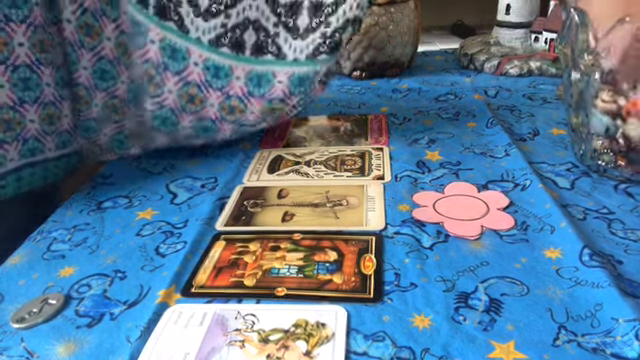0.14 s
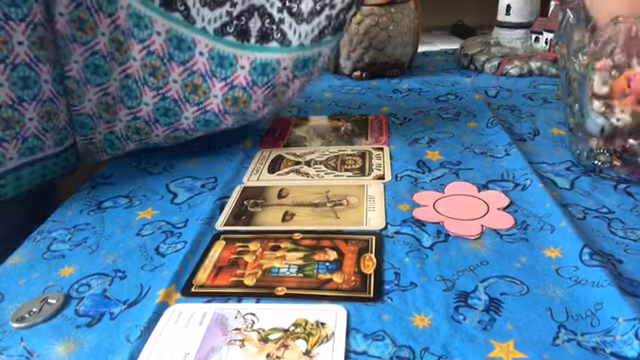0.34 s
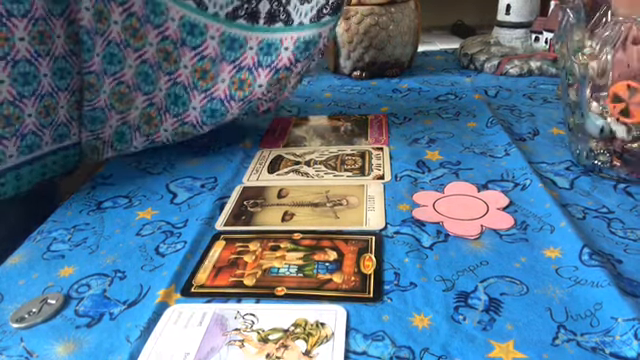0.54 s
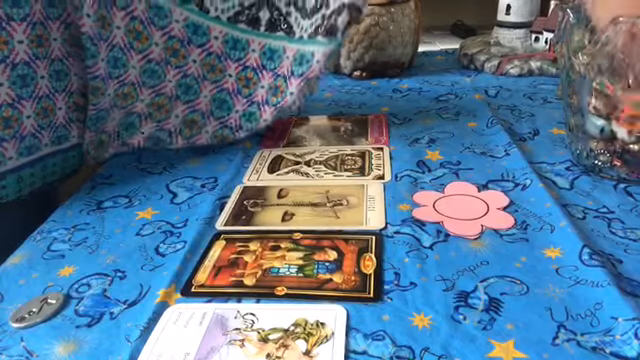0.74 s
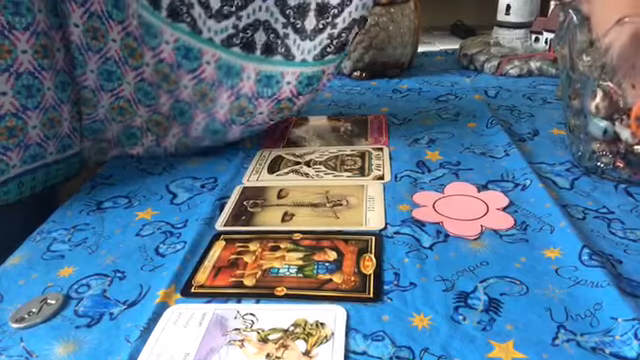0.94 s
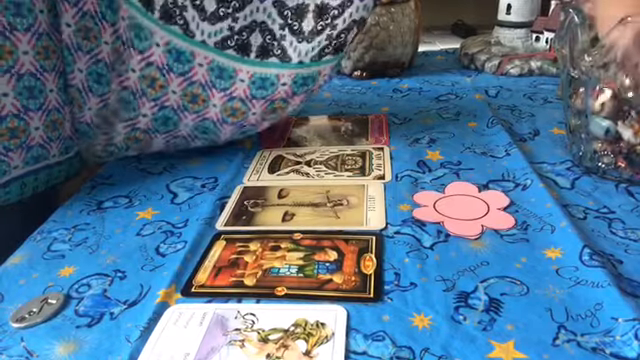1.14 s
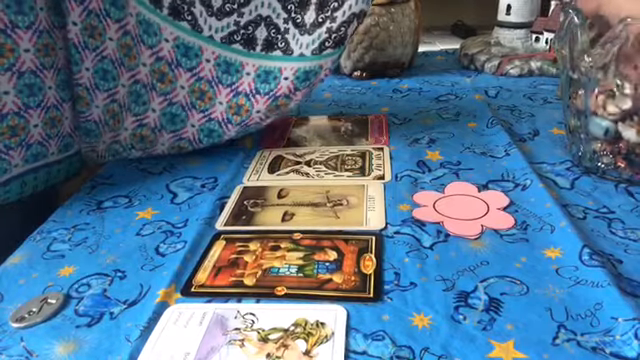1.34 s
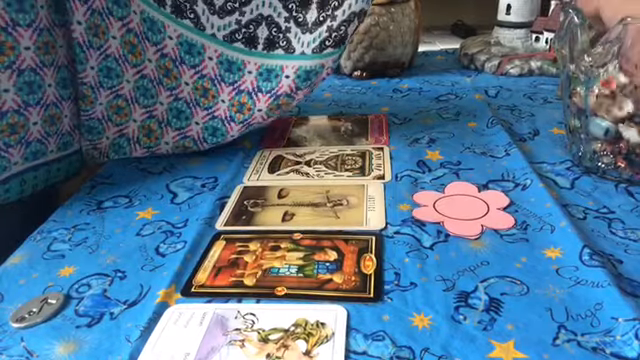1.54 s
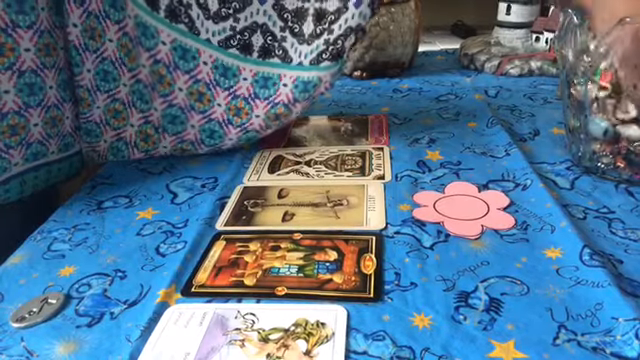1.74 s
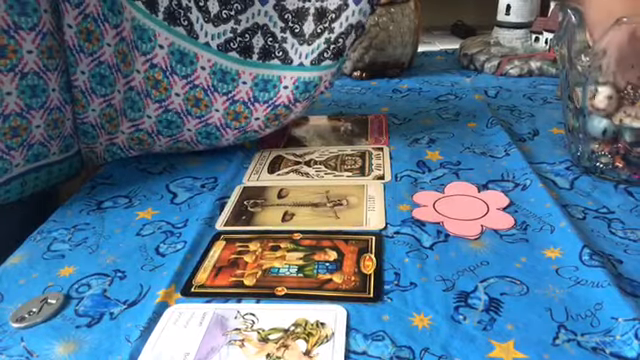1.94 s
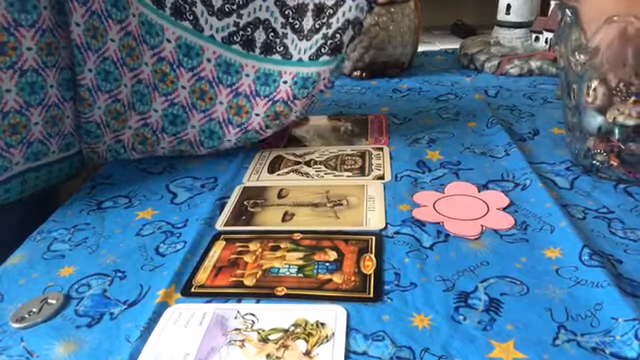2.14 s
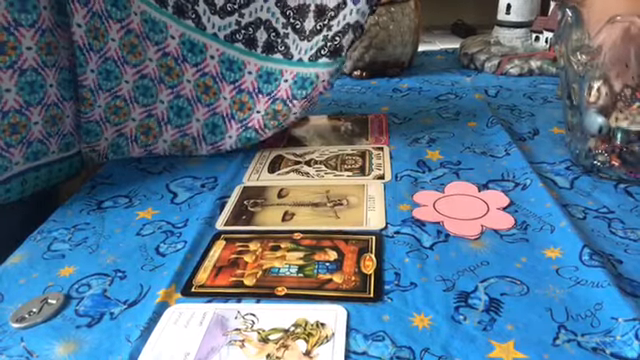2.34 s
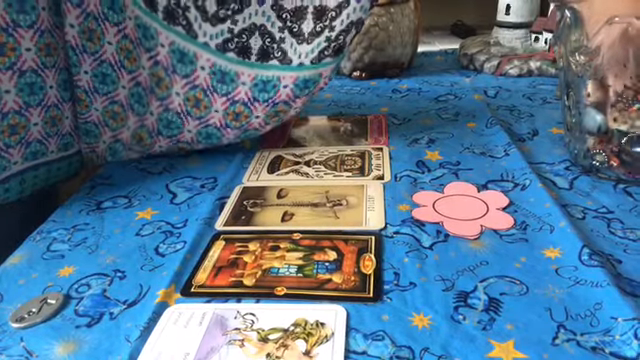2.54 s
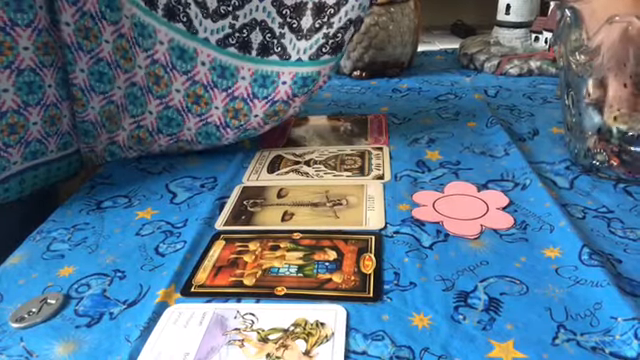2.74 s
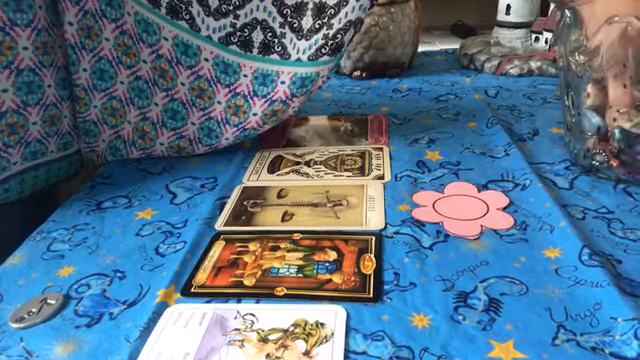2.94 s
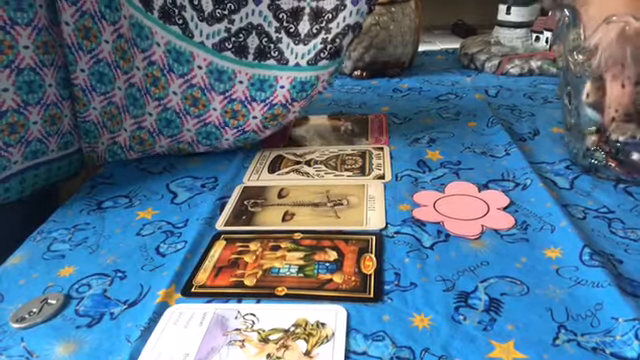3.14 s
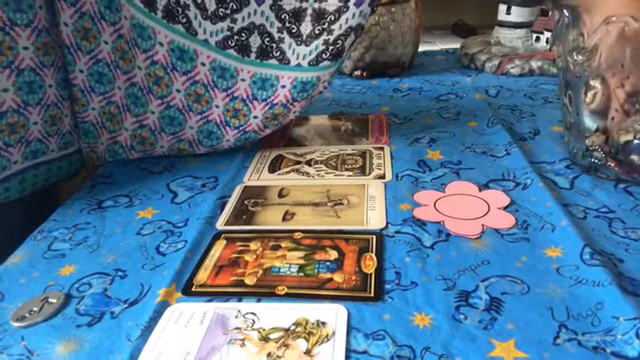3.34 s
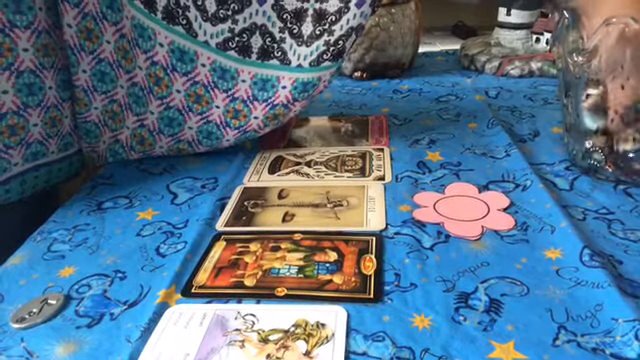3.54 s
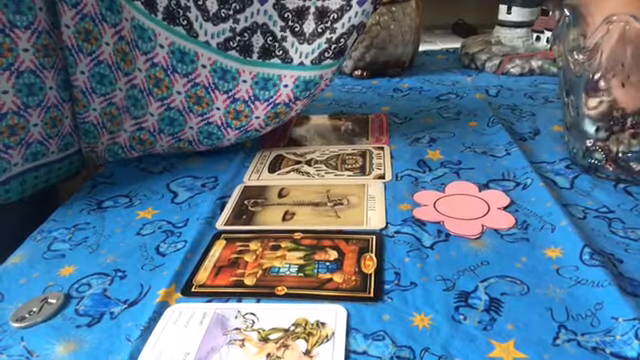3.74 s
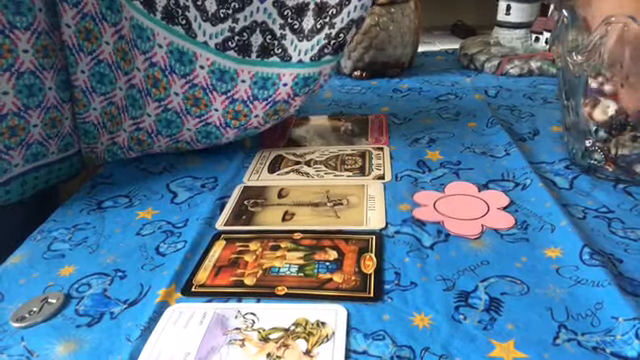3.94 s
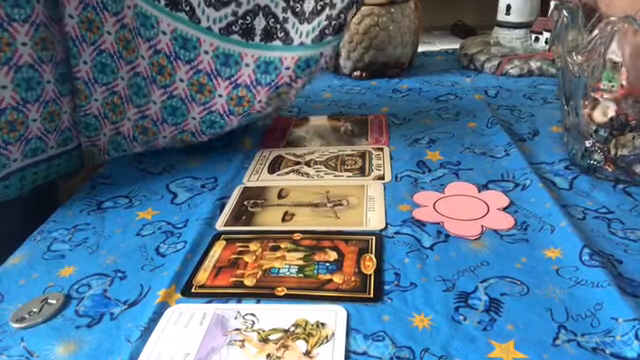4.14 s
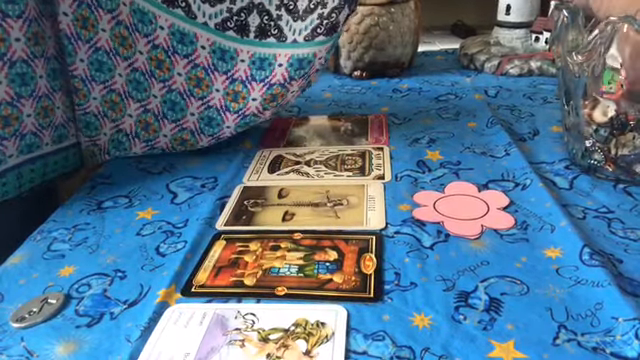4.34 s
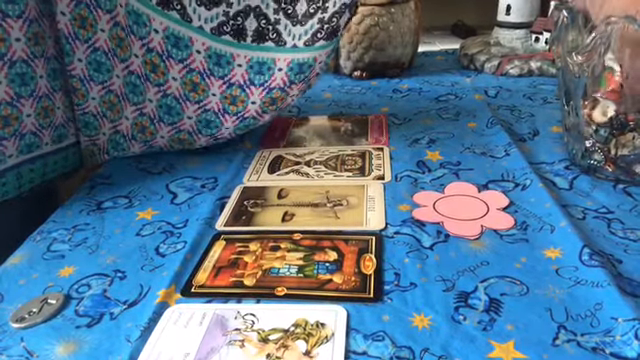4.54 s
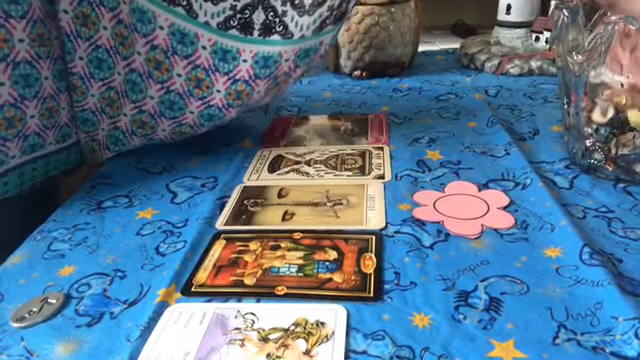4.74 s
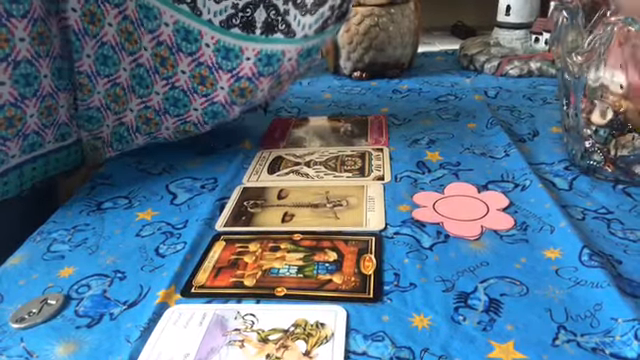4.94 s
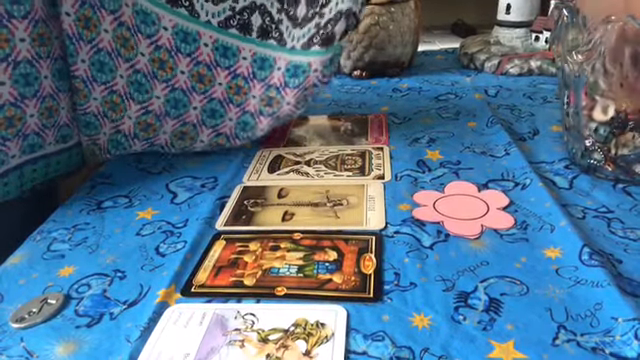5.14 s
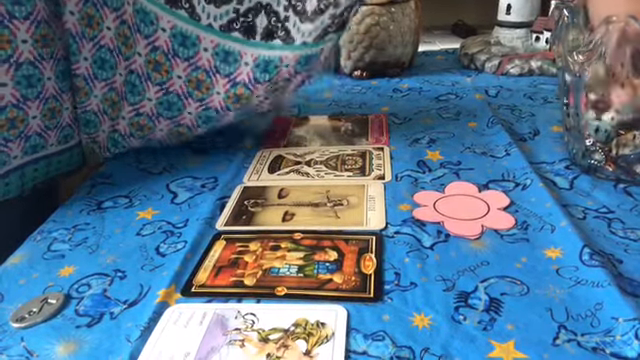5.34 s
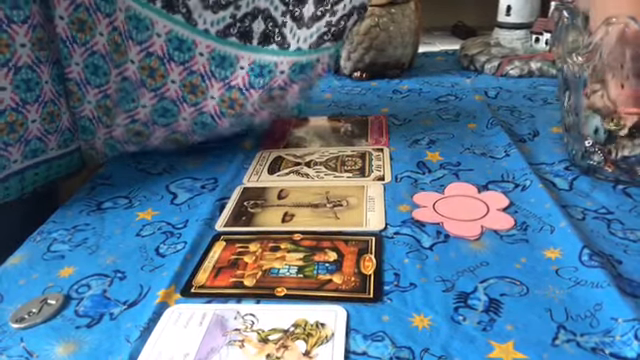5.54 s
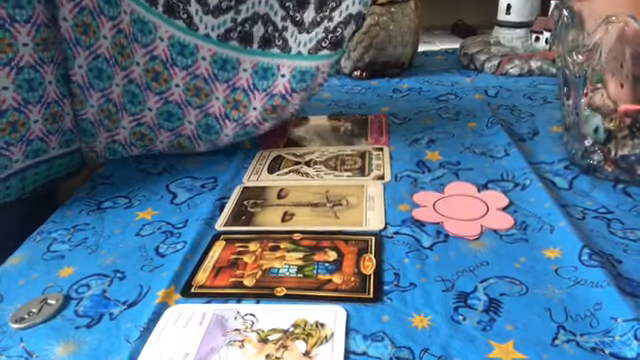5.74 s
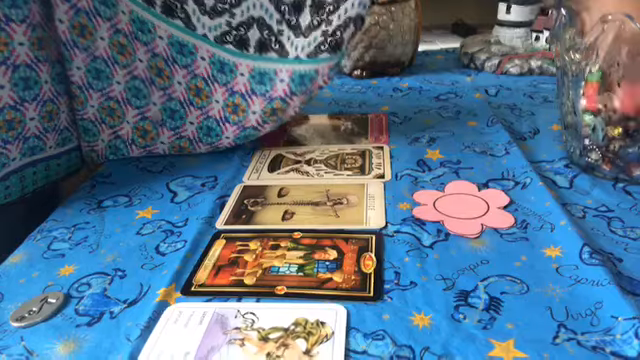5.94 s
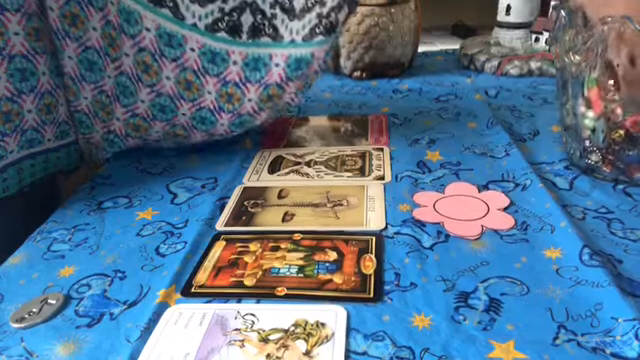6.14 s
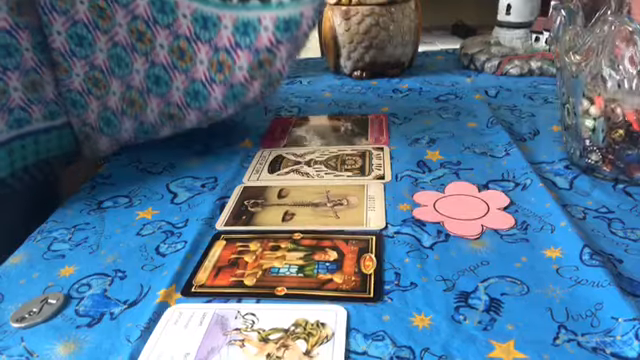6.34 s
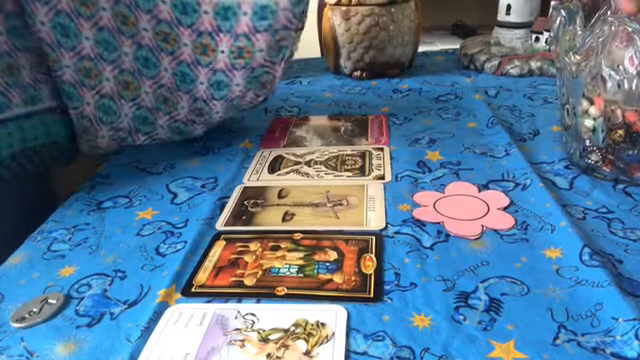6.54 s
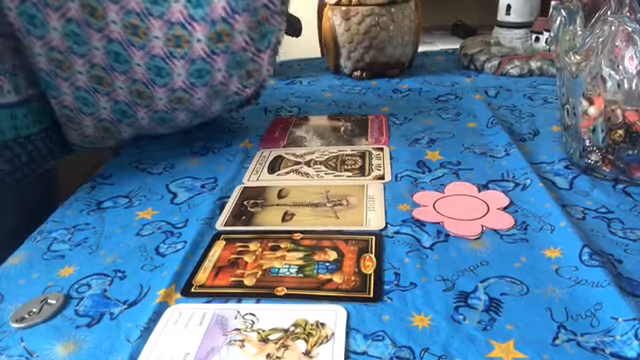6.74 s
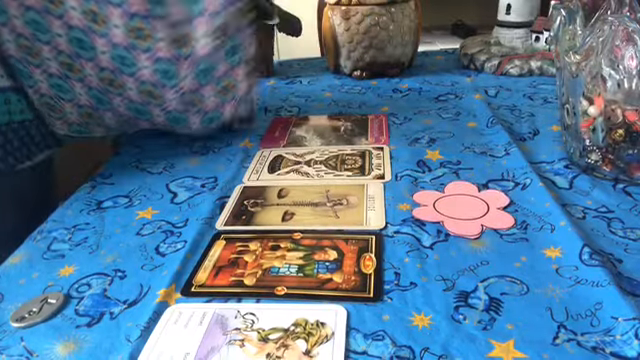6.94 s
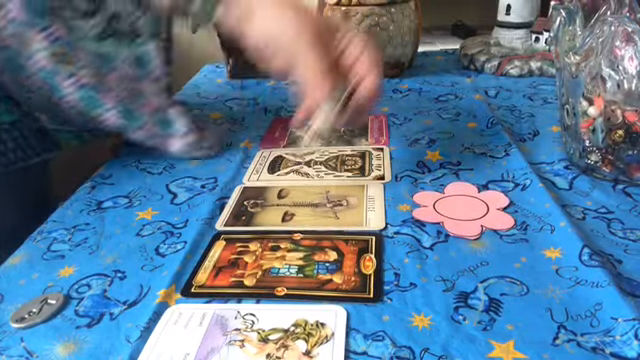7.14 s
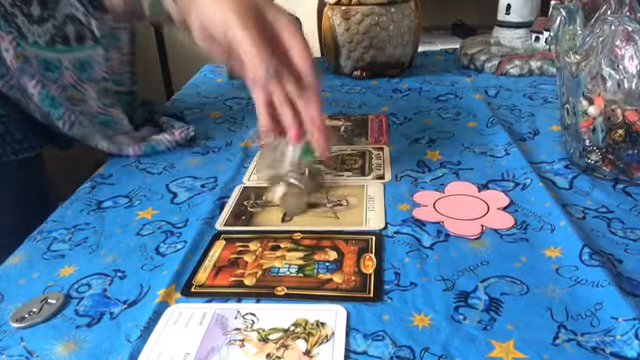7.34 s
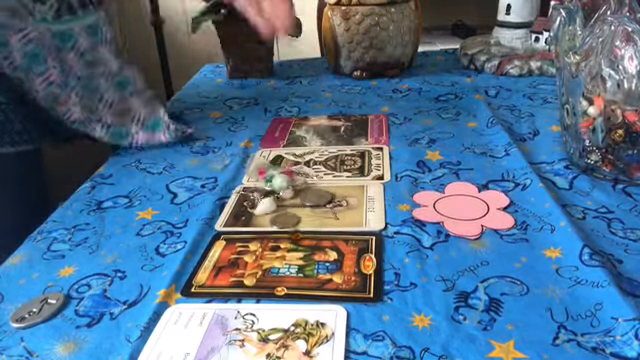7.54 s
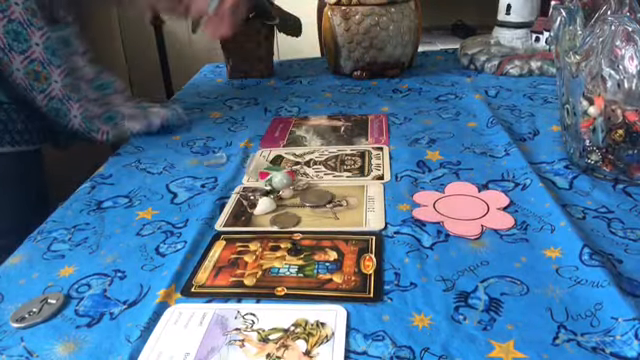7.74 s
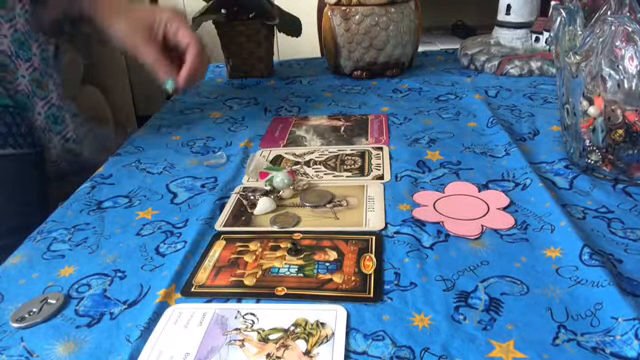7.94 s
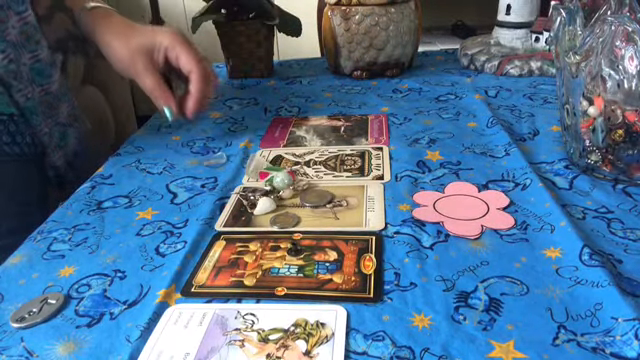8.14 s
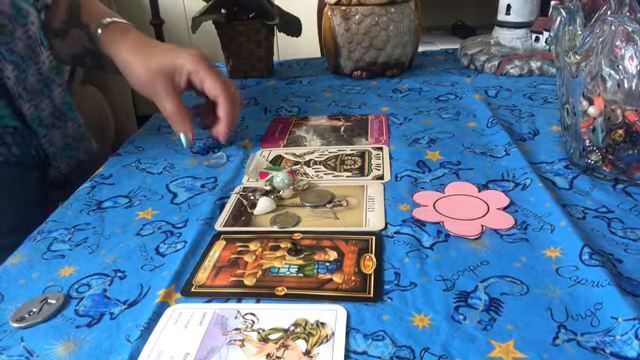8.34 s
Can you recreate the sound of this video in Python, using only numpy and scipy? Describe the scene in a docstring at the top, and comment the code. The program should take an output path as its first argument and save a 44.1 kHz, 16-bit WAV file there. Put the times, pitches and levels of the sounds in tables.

```python
"""Charms rummaged in a glass jar, then dropped.

A hand stirs small glass, stone and metal charms in a quiet room: strokes gate random touches, which
excite the jar's resonances, scrapes, small clinks and a heap rumble; single knocks ring decaying modes.
Metal charms chime as paired dying sines. A handful then drops on cards on a cloth-covered table:
damped clacks, a tumbling clatter and table thuds. Noise reflections and still air surround it all."""
import sys
import numpy as np
from scipy import signal
from scipy.fft import rfft, irfft
from scipy.io import wavfile
from scipy.ndimage import uniform_filter1d

SR = 44100
rng = np.random.default_rng(int(sys.argv[2]) if len(sys.argv) > 2 else 0)


def bounce(signal):
    """Save signal as a 16-bit WAV file at the path given by the first command-line argument."""
    frames = np.transpose(np.atleast_2d(signal))
    limited = np.clip(frames, -1, 1)
    pcm = np.round(limited * 32767).astype(np.int16)
    wavfile.write(sys.argv[1], SR, pcm)


N = 369999

# Modes of the jar wall. Each row: frequency in Hz, bandwidth in Hz, relative level in dB.
JAR_MODES = [(783, 27, -12), (958, 14, -4.5), (1005, 14, -5), (2476, 11.1, 4), (2562, 14, 1.5),
             (3698, 8.9, 0), (4091, 12.4, 5), (4240, 25, -2), (4645, 26, 1.5), (4805, 52, -0.5),
             (4823, 19, -8), (5168, 44, 3.5), (5344, 210, -7.5), (6844, 68.5, -3.5), (6840, 40, -23.5),
             (7103, 56, 1), (7750, 61, -4), (8520, 55, -11.5), (9250, 56, -4.5), (9700, 55, -20.5),
             (9800, 37, -8), (10290, 41, -22), (10410, 29, -21.5), (10810, 61, -8), (12480, 91, -29.5),
             (14280, 50, -24), (14500, 92, -18.5)]
# Spectrum of the dry tick of charm on charm. Each row: frequency in Hz, relative level in dB.
TICK_SPECTRUM = [(300, -24), (900, -3.5), (1500, 0), (2200, 0), (3400, 1), (5300, 3), (8500, -3.5),
                 (12000, -2), (15500, -13)]
# Spectrum of charms clacking on the cards. Each row: frequency in Hz, relative level in dB.
CLACK_SPECTRUM = [(250, -8), (600, -23), (900, -7.5), (2000, -1), (3500, 6), (6400, 3.5), (10000, -15),
                  (15000, -6)]


def stirring(resting_db=-60.5, hand_out_s=6.88, leaving_s=0.044):
    """Rattle gain of the finger strokes, and the share of it that presses on the glass."""
    # Each row: start in seconds, length in seconds, rattle level in dB, pressure on the glass in dB.
    strokes = [(0.093, .02, -29, 1), (0.196, 0.084, -35.5, -4.5), (0.39, 0.15, -30, 4.5),
               (0.706, 0.16, -33, 3.5), (1.008, 0.061, -42, -1), (1.122, 0.085, -35.5, 0.5),
               (1.304, 0.046, -38, 1.5), (1.478, 0.088, -37, 2), (1.619, 0.29, -37, 8),
               (1.942, 0.023, -30, 6), (2.028, 0.073, -37, -3.5), (2.377, 0.036, -39.5, -2),
               (2.531, 0.024, -27, -4), (2.807, 0.052, -36, -2), (3.037, 0.096, -37.5, -18),
               (3.108, 0.19, -33, -1), (3.477, 0.047, -41, 1), (3.588, 0.017, -33, -16),
               (3.668, 0.04, -35, -4.5), (3.961, 0.029, -44.5, 2.5), (4.064, 0.096, -35.5, 0),
               (4.259, 0.023, -42, -15), (4.358, 0.09, -39.5, -3.5), (4.74, 0.12, -37.5, 4),
               (5.039, 0.06, -36, 0.5), (5.186, 0.061, -42.5, 6.5), (5.353, 0.14, -34, 4.5),
               (5.552, 0.015, -30, -1.5), (5.621, 0.074, -29.5, -5), (5.915, 0.24, -32, 2),
               (6.308, 0.09, -36.5, -14), (6.516, 0.0075, -40, -1)]
    s, length_s, rattle_db, press_db = np.transpose(strokes)
    # a faint rustle between strokes, until the hand leaves the jar
    since_out_s = np.maximum(np.arange(N) / SR - hand_out_s, 0)
    resting = from_db(resting_db) * np.exp(-since_out_s / leaving_s)
    rattle = np.hypot(pushes(zip(s, length_s, rattle_db)), resting)
    on_glass = np.hypot(pushes(zip(s, length_s, rattle_db + press_db)), from_db(-0.5) * resting)
    return rattle, on_glass / rattle


def rummage(rattle, press, roam_db=4.0, brisk_db=-37.5, treble_hz=7940, treble_follows=0.45):
    """Charms grind, tick and clink; as they roam over the wall, its modes come and go."""
    touches = rattle * contacts(per_s=500, spread_db=6.5, even_s=0.072)
    wall = np.zeros(N)
    for hz, width_hz, db in JAR_MODES:
        mode_gain = from_db(db + roam_db * wander(per_s=12))
        wall += resonate(press * touches * rng.standard_normal(N) * mode_gain, hz, width_hz)

    # each touch is a brief scrape of its own colour
    scrape_power = dying_noise(t60_s=0.015, size=1024) ** 2
    tick_power = np.abs(signal.fftconvolve(touches ** 2, scrape_power)[:N])
    ticks = np.sqrt(tick_power) * rng.standard_normal(N)
    loose = clinks(rattle * contacts(per_s=1700, spread_db=6.0, even_s=0.05), width_hz=88)
    dry_charms = colour(from_db(-10.5) * ticks + from_db(-10) * loose, TICK_SPECTRUM)
    bright = from_db(8.5) * wall + dry_charms

    # a gentle stir is duller: below a brisk one the treble fades faster than the rattle
    dull = lowpass(bright, treble_hz)
    treble_gain = np.minimum(rattle / from_db(brisk_db), 1) ** treble_follows
    return dull + treble_gain * (bright - dull)


def heap(rattle):
    """The heap shifts against the jar's bottom: dense touches through a low spectrum."""
    # Each row: frequency in Hz, relative level in dB.
    heap_spectrum = [(20, -24.5), (45, -2.5), (100, -1.5), (150, 6), (230, -9.5), (340, 2), (480, -7.5),
                     (580, 2), (1050, -3), (1500, -14.5), (2500, -11)]
    shove = from_db(-28.5) * rattle ** 0.53   # even a gentle stir moves the whole heap
    return colour(shove * contacts(per_s=350, spread_db=3.5, even_s=0.36), heap_spectrum)


def knocks(pivot_hz=6000, favour_db=8.0, favour_hz=60, scatter_db=2.5, grip_hz=2.5, size=14000):
    """Knocks ring the jar; the spot hit favours one mode, a hard charm the upper ones."""
    # Each row: time in seconds, relative level in dB, favoured jar mode in Hz, hardness in dB per octave.
    knock_table = [(0.077, -20.5, 4240, 11), (0.1, -14, 4240, 6.5), (0.249, -14.5, 7750, 5),
                   (0.342, -21, 5168, 0), (0.394, -19, 7750, 16), (0.414, -13.5, 7750, 10),
                   (0.474, -12, 4805, 5.5), (0.68, -18, 5168, 1.5), (0.711, -17.5, 5168, 10),
                   (0.735, -18.5, 5168, 11), (0.978, -23.5, 5168, -9), (1.222, -20, 5168, 2.5),
                   (1.478, -18.5, 7103, -2), (1.487, -12, 3698, 4), (1.618, -15, 3698, 3.5),
                   (1.669, -16.5, 5168, -3), (1.778, -15.5, 4091, -0.5), (1.867, -18.5, 5168, 6),
                   (1.94, -12.5, 1005, -2), (1.953, -6.5, 7103, 3.5), (2.06, -17, 7103, 17),
                   (2.113, -17.5, 7103, 10), (2.235, -31.5, 4240, 0.5), (2.30, -34, 5168, -1),
                   (2.381, -25, 4645, -0.5), (2.522, -18, 4091, 0), (2.836, -20.5, 4091, 1),
                   (2.945, -22, 4645, -1.5), (3.113, -16, 4091, 16), (3.153, -6.5, 4645, 1),
                   (3.232, -17, 2476, 7), (3.286, -17.5, 9250, 9), (3.33, -14.5, 4645, 5.5),
                   (3.59, -18.5, 10800, 2.5), (3.679, -17.5, 7750, -2.5), (3.835, -24, 4805, -1),
                   (4.087, -15, 4091, 4), (4.157, -24, 9250, 13), (4.247, -32, 9250, 21),
                   (4.784, -23, 5168, 4), (4.854, -11.5, 4091, 1.5), (5.036, -21.5, 4091, 7),
                   (5.076, -23.5, 4091, -3.5), (5.196, -22.5, 2562, -1), (5.37, -16.5, 9250, -6),
                   (5.399, -4.5, 9250, 7), (5.404, -1.5, 2476, 6), (5.483, -18.5, 4091, -12),
                   (5.559, -14.5, 5168, -0.5), (5.604, -15.5, 5168, 3), (5.625, -13.5, 2476, 1),
                   (5.659, -26, 2476, 19), (5.679, -30, 3698, 2), (5.767, -29.5, 7750, 14),
                   (5.916, -16.5, 2476, 9), (5.937, -13, 1005, 4), (5.995, -15, 7103, -1),
                   (6.109, -17.5, 5168, 4), (6.313, -25, 4805, 11), (6.352, -23.5, 4805, 7),
                   (6.521, -19, 1005, 8), (6.538, -17.5, 2476, 5.5), (6.677, -36, 7103, 16),
                   (6.731, -25.5, 7750, 8), (6.792, -29, 4805, 7), (6.842, -31, 5168, 1.5),
                   (6.888, -43.5, 5168, 3), (6.926, -45, 7103, 4.5)]
    out = np.zeros(N)
    hz, width_hz, db = np.transpose(JAR_MODES)
    ring_s = np.log(1000) / (np.pi * (width_hz + grip_hz))
    modes = np.array([note(f, t60_s, size=size) for f, t60_s in zip(hz, ring_s)])
    for s, level_db, spot_hz, tilt in knock_table:
        def hardness_db(f):
            return tilt * np.log2(np.maximum(f, pivot_hz / 2) / pivot_hz)

        favoured_db = favour_db * np.exp(-((hz - spot_hz) / favour_hz) ** 2)
        scattered_db = rng.normal(0, scatter_db, len(hz))
        shares = from_db(db + favoured_db + hardness_db(hz) + scattered_db) * width_hz
        wall = (shares * rng.choice([-1, 1], len(hz))) @ modes
        # the charm rebounds
        wall = signal.fftconvolve(wall, chatter(t60_s=0.017, after_db=-1.5, size=2048))[:size]
        tick_spectrum = [(f, d + hardness_db(f)) for f, d in TICK_SPECTRUM]
        tick = colour(chatter(t60_s=0.065, after_db=13.5, size=size), tick_spectrum)
        knock = rms_one(wall) + from_db(-11.5) * rms_one(tick)
        add(out, s, from_db(level_db - 27.0) * rms_one(knock))
    return out


def chimes(lower_pitch=0.759, lower_ring=1.14):
    """Struck metal charms ring on at a high pitch and a lower, longer partial."""
    # Each row: time in seconds, level in dB, pitch in Hz, 60 dB decay in seconds, lower partial in dB.
    chime_table = [(0.8262, -14, 14280, 0.08, -8), (2.380, -28, 14500, .038, -14),
                   (4.248, -25.5, 9300, 0.04, -20), (4.3892, -19, 12200, 0.036, -22),
                   (6.046, -26.5, 11100, 0.055, -22.5), (6.6774, -31, 5460, 0.07, -27.5),
                   (6.731, -35, 15300, .06, -20), (7.314, -27, 14240, .07, -14),
                   (7.383, -19, 12480, .04, -24), (7.3834, -18, 14200, .06, -14),
                   (7.3981, -15.5, 14280, 0.081, -7), (7.4557, -17, 12480, 0.038, -21.5),
                   (7.455, -18, 11400, .04, -25), (7.467, -16.5, 14000, .044, -9),
                   (7.5283, -20.5, 14210, 0.08, 1.5), (7.5283, -26, 15300, .2, -20),
                   (7.617, -22, 12400, 0.06, -28), (7.6166, -27.5, 14220, 0.13, 2),
                   (7.641, -16.5, 14050, 0.058, -19)]
    out = np.zeros(N)
    for s, db, hz, t60_s, lower_db in chime_table:
        lower = from_db(lower_db) * note(hz * lower_pitch, t60_s * lower_ring)
        add(out, s, from_db(db) * (note(hz, t60_s) + lower))
    return out


def landings(body_q=12.0, damping_hz=260, body_db=4.5, flurry_s=0.018, size=4096):
    """Each landing clacks at its own pitch, mostly a charm's, though the low one at 590 Hz is the table top
    ringing, and is damped at once by the cards on the cloth."""
    # Each row: time in seconds, relative level in dB, pitch of the clack in Hz.
    landing_table = [(7.214, -38.5, 4050), (7.278, -15, 3470), (7.281, -28.5, 3450), (7.2978, -14.5, 3800),
                     (7.304, -13, 3720), (7.331, -14, 3600), (7.3446, -10.5, 6040), (7.3488, -9, 4100),
                     (7.377, -14, 3600), (7.399, -14.5, 6900), (7.438, -14.5, 4540), (7.463, -9.5, 5400),
                     (7.488, -23, 5000), (7.529, -19, 6500), (7.544, -16.5, 1380), (7.553, -10.5, 2970),
                     (7.554, -16, 590), (7.555, -18.5, 1290), (7.6, -21.5, 6000), (7.616, -12.5, 5840),
                     (7.642, -20, 6000), (7.665, -15.5, 3740)]
    out = np.zeros(N)
    for s, level_db, hz in landing_table:
        touch = chatter(t60_s=flurry_s, after_db=-0.5, size=size)
        body = resonate(touch, hz, hz / body_q + damping_hz)
        clack = rms_one(colour(touch, CLACK_SPECTRUM)) + from_db(body_db) * rms_one(body)
        add(out, s, from_db(level_db - 27.5) * rms_one(clack))
    return out


def spill():
    """The handful tumbles, slides apart and settles, and the table top thuds under it."""
    # Each row: start in seconds, length in seconds, clatter level in dB, table thud level in dB.
    tumbles = [(7.319, .02, -42, -56), (7.35, 0.1, -36.5, -47), (7.453, 0.032, -33, -45.5),
               (7.664, 0.023, -41, -54.5), (7.777, 0.024, -52, -57), (7.88, 0.12, -65.5, -64)]
    # Spectrum of the table top. Each row: frequency in Hz, relative level in dB.
    table_spectrum = [(60, -21), (130, -5), (180, 0.5), (270, -7), (600, -12), (1500, -32)]
    s, length_s, clatter_db, thud_db = np.transpose(tumbles)
    clatter = pushes(zip(s, length_s, clatter_db))
    taps = clatter * contacts(per_s=2100, spread_db=7.5, even_s=0.037)
    loose = clinks(clatter * contacts(per_s=7000, spread_db=8.0, even_s=0.046))
    thuds = pushes(zip(s, length_s, thud_db)) * contacts(per_s=400, spread_db=1.5, even_s=0.015)
    on_cards = colour(from_db(-2.0) * taps + from_db(-14) * loose, CLACK_SPECTRUM)
    return on_cards + from_db(-5.5) * loose + colour(thuds, table_spectrum)


def room(x, t60_s=0.2, wall_hz=7000, size=20000):
    """Dense, slightly dull reflections of a furnished room, a few milliseconds late."""
    tail = np.pad(dying_noise(t60_s, size), (SR // 250, 0))
    return signal.fftconvolve(x, lowpass(tail, wall_hz))[:N]


def still_air(level_db=-64):
    """Steady coloured noise of the quiet room."""
    # Each row: frequency in Hz, relative level in dB.
    air_spectrum = [(15, -50), (25, -15), (38, -15.5), (92, -3), (145, -24), (223, -15), (887, -25),
                    (962, -22), (6740, -40.5), (16000, -47)]
    return from_db(level_db) * colour(rng.standard_normal(N), air_spectrum, size=8192)


def pushes(rows, rise_db_per_s=475, sag_db_per_s=23.5, fall_db_per_s=288.5,
           settle_db=-9, settle_db_per_s=116.5):
    """Gain of pushes (s, length s, dB): fast rise, sag, fall, then slower settling of the heap."""
    t = np.arange(N) / SR
    coarse_t = t[::32]
    power = 1e-14
    for s, length_s, db in rows:
        before = np.maximum(s - coarse_t, 0)
        during = np.clip(coarse_t - s, 0, length_s)
        after = np.maximum(coarse_t - s - length_s, 0)
        release_db = np.maximum(-fall_db_per_s * after, settle_db - settle_db_per_s * after)
        shape_db = db - rise_db_per_s * before - sag_db_per_s * during + release_db
        power = power + from_db(np.maximum(shape_db, -200)) ** 2
    return np.interp(t, coarse_t, np.sqrt(power))


def contacts(per_s, spread_db, even_s):
    """Random touches of very unequal force, whose power stays even over longer stretches."""
    force = from_db(spread_db * np.minimum(rng.exponential(1, N), 3))
    clicks = force * rng.choice([-1, 1], N) * (rng.random(N) < per_s / SR)
    mean_power = uniform_filter1d(clicks ** 2, int(even_s * SR))
    return clicks / np.sqrt(np.maximum(mean_power, 1e-6))


def clinks(touches, width_hz=130, count=60):
    """Each touch falls on one of many small charms, each with a short ring of its own pitch."""
    pitches_hz = np.linspace(2000, 15700, count) + rng.uniform(-100, 100, count)
    dealt = rng.integers(0, count, N)
    rings = sum(resonate(touches * (dealt == k), hz, width_hz) for k, hz in enumerate(pitches_hz))
    return rings * np.sqrt(SR / (np.pi * width_hz))


def chatter(t60_s, after_db, size):
    """One sharp touch, then a dying flurry as the neighbours are jostled."""
    return signal.unit_impulse(size) + from_db(after_db) * dying_noise(t60_s, size)


def dying_noise(t60_s, size):
    """A dense decay of unit energy."""
    tail = rng.standard_normal(size) * from_db(-60 * np.arange(size) / SR / t60_s)
    return tail / np.linalg.norm(tail)


def note(hz, t60_s, size=16384):
    """One dying sine."""
    t = np.arange(size) / SR
    return np.sin(2 * np.pi * hz * t) * from_db(-60 * t / t60_s)


def wander(per_s):
    """Slow random motion through normally distributed knots."""
    knots = rng.standard_normal(4096)
    return np.interp(np.arange(N) / SR * per_s, np.arange(len(knots)), knots)


def resonate(x, hz, width_hz):
    """Two-pole resonance with gain 1 on top."""
    r = np.exp(-np.pi * width_hz / SR)
    zeros = np.array([1, 0, -1]) * (1 - r * r) / 2
    poles = [1, -2 * r * np.cos(2 * np.pi * hz / SR), r * r]
    return signal.lfilter(zeros, poles, x + 1e-18)


def colour(x, spectrum, size=2048):
    """Causal (minimum-phase) filter of unit power with the given spectrum."""
    hz, db = np.transpose(spectrum)
    grid_hz = np.maximum(np.arange(size // 2 + 1) * SR / size, 1)
    grid_db = np.interp(np.log(grid_hz), np.log(hz), db)
    cepstrum = irfft(np.log(from_db(grid_db)))
    # fold onto positive time for minimum phase
    cepstrum[1:size // 2] *= 2
    cepstrum[size // 2 + 1:] = 0
    response = irfft(np.exp(rfft(cepstrum)))
    return signal.fftconvolve(x, response / np.linalg.norm(response))[:len(x)]


def lowpass(x, hz):
    """First-order treble loss."""
    return signal.sosfilt(signal.butter(1, hz, fs=SR, output="sos"), x)


def from_db(db):
    """Decibels to gain."""
    return 10 ** (np.asarray(db) / 20)


def rms_one(x):
    """Scale to rms 1."""
    return x / np.sqrt(np.mean(x ** 2) + 1e-20)


def add(track, s, sound):
    """Mix a sound in at time s."""
    at = round(s * SR)
    track[at:at + len(sound)] += sound[:N - at]


def scene():
    """Jar, drop, room and still air, in one channel."""
    rattle, press = stirring()
    jar = rummage(rattle, press) + heap(rattle) + knocks()
    charms = jar + chimes() + landings() + spill()
    return (charms + from_db(-6) * room(charms) + still_air())[None]


def record(dry, cutoff_hz=15900):
    """The top is cut steeply by an elliptic lowpass."""
    steep = signal.ellip(10, 0.2, 80, cutoff_hz, fs=SR, output="sos")
    return signal.sosfilt(steep, dry)


dry = scene()
out = record(dry)
bounce(out)
```